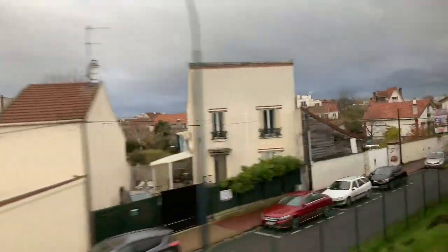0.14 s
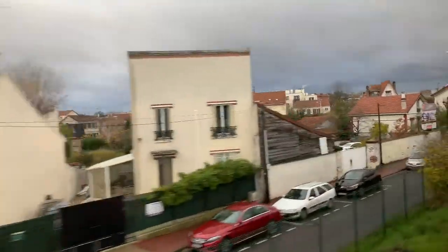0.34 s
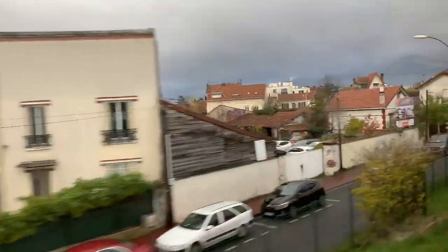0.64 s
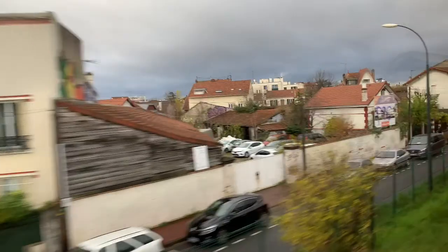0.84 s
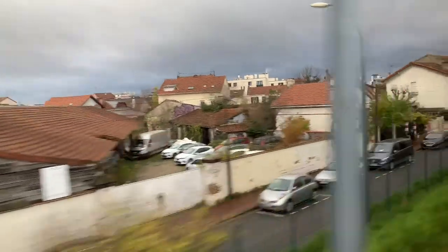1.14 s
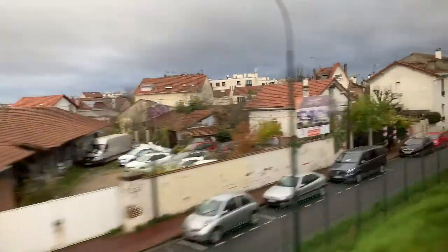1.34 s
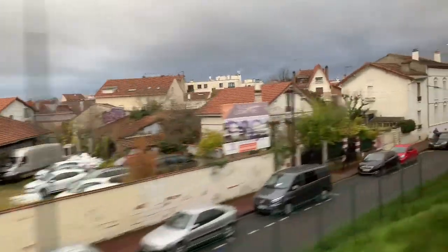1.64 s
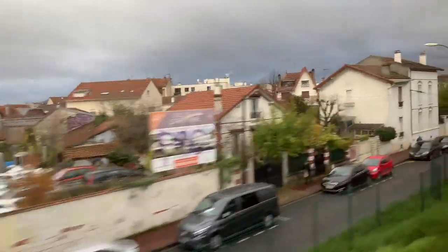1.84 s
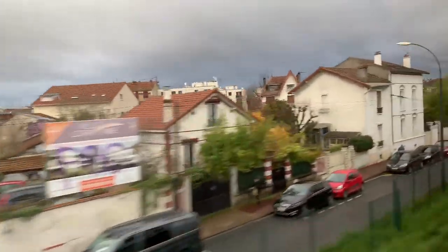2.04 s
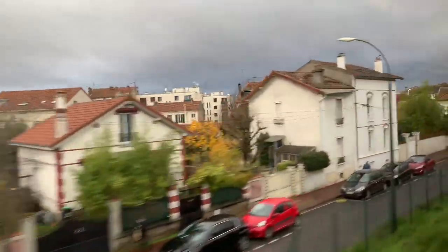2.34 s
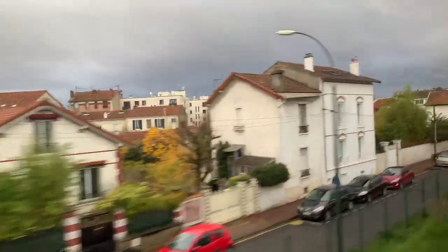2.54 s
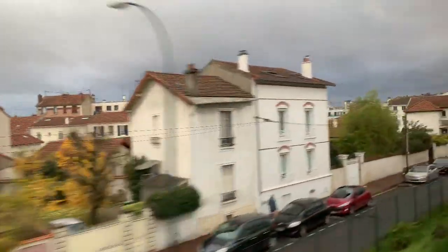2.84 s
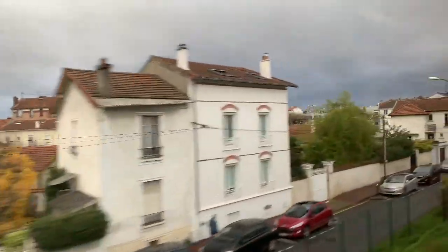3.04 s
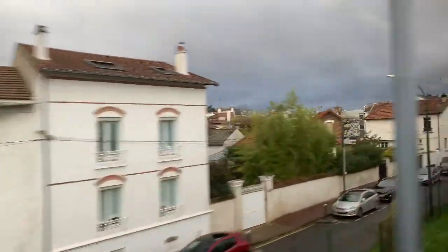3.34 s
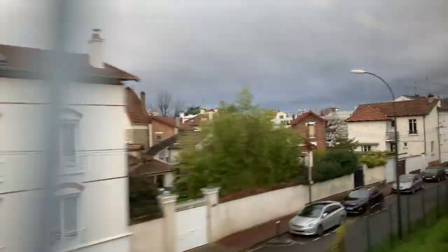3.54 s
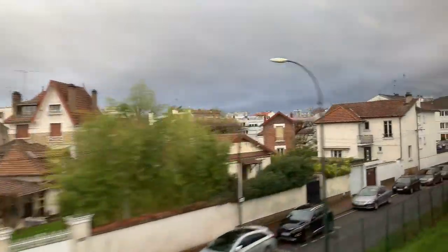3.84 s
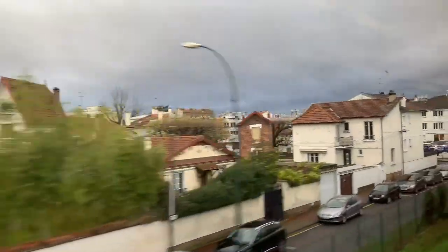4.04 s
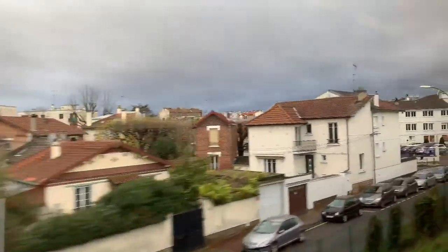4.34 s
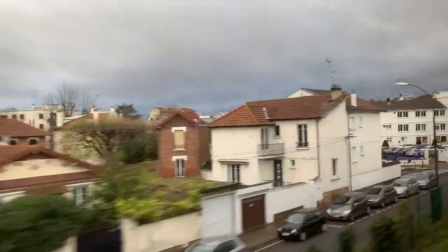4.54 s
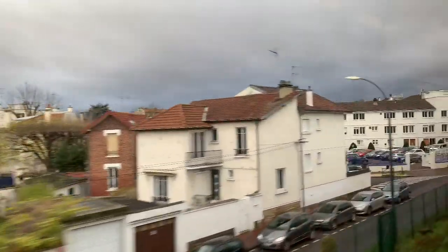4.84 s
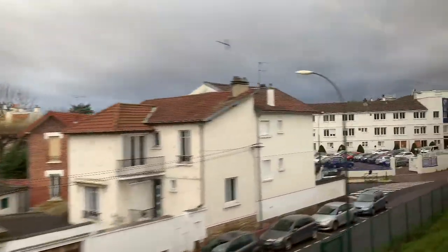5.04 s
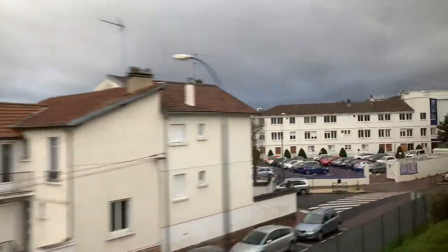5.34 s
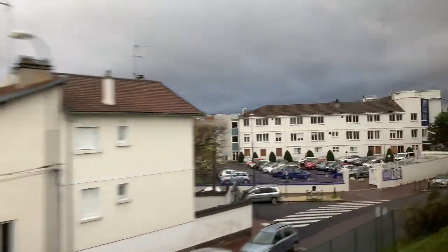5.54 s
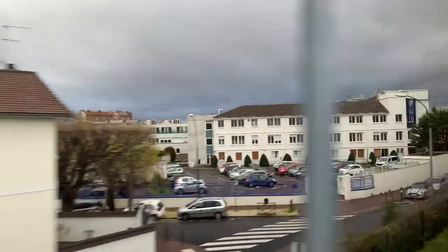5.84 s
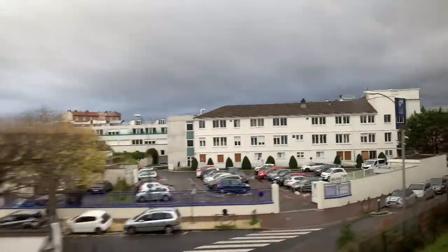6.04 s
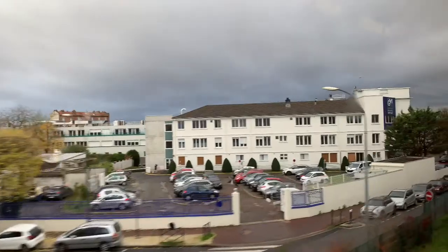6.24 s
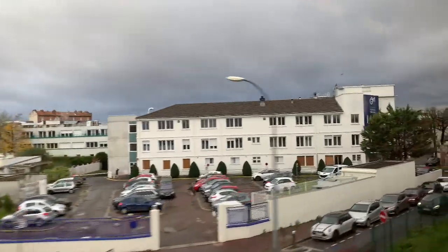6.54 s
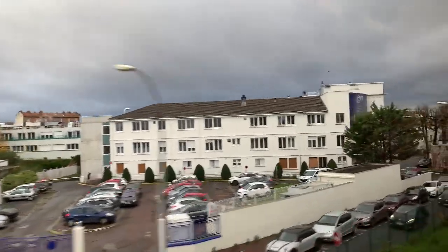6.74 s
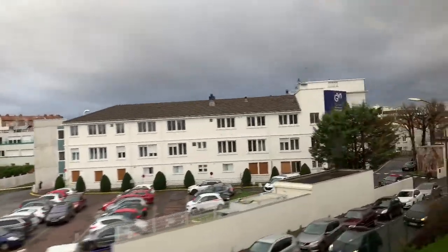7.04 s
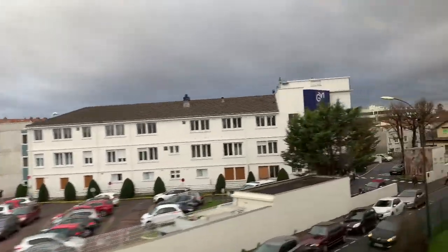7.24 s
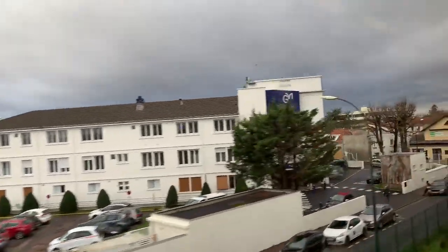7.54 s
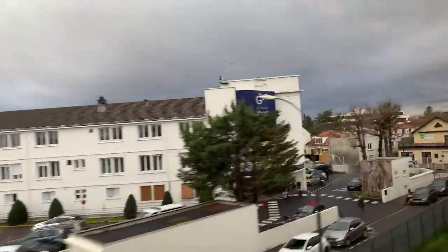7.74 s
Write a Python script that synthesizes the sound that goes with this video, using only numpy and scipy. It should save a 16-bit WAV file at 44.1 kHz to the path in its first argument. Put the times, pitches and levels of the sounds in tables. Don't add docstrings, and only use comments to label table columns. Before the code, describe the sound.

From 0 to about 8 seconds, the inside of a commuter train running at steady speed, captured in stereo by a small device beside the window. Very low rumble dominates, shuddering unevenly as the car body sways and the floor booms in soft, irregular swells rather than regular rail clacks. Above it lie a dull floor thud, wall drone and grainy muffled wheel roar, with a thin steady ventilation hiss. A faint, fuzzy gear whine surfaces intermittently at one constant pitch. Tiny trim squeaks chirp near 1.05 and 1.73 seconds, slightly left. From 2.4 seconds the booms become denser, with stronger low knocks around 3.6 to 4.3. At 4.9 a brake valve starts leaking softly; from 5.9 to about 6.45 air puffs out, fluttering, then fades into a continuing breathy leak. Rumbling continues to the end without stopping; the cabin is close, with very short echoes.

```python
import sys
import numpy as np
from scipy import signal
from scipy.fft import rfft, irfft, next_fast_len
from scipy.io import wavfile
from scipy.ndimage import uniform_filter1d, map_coordinates

SR = 44100
rng = np.random.default_rng(int(sys.argv[2]) if len(sys.argv) > 2 else 0)


def amplitude_ratio(level_db):
    exponent = np.asarray(level_db, float) / 20
    return 10 ** exponent


def put_to_file(sound):
    columns = np.atleast_2d(sound).T
    safe = np.clip(columns, -1, 1)
    whole_steps = np.round(safe * 32767)
    wavfile.write(sys.argv[1], SR, whole_steps.astype(np.int16))


N = 348831

# time in seconds, level in dB.
RAIL_ROUGHNESS = [(0, 1.5), (.4, -0.5), (.7, .5), (1.05, -0.5), (1.4, 0), (2, -1), (2.3, 0), (2.8, 0),
                  (3.4, -.5), (3.75, 0.5), (4.3, .5), (5, 0), (5.8, 1), (6.2, -0.5), (6.5, 2), (6.8, -1),
                  (7.3, .5), (7.91, -1.5)]

# middle in seconds, peak in dB, pitch in Hz, length in seconds.
BODY_SWAYS = [(0.14, -20.5, 49.0, 0.25), (0.34, -23, 56.0, 0.068), (0.82, -23, 49.0, 0.32),
              (1.44, -19, 48.0, 0.11), (1.69, -23, 56.0, 0.15), (2.04, -30, 49.0, 0.28),
              (2.4, -20, 47.0, 0.23), (2.54, -32, 43.0, 0.21), (2.83, -18, 49.0, 0.25),
              (2.84, -11.5, 56.0, 0.028), (3.27, -13, 49.0, 0.056), (3.39, -20, 52.0, 0.067),
              (3.65, -19, 49.0, 0.15), (3.76, -23.5, 44.0, 0.28), (3.96, -16.5, 47.0, 0.05),
              (4.39, -17.5, 42.0, 0.11), (4.7, -23.0, 46.0, 0.22), (4.92, -13.5, 52.0, 0.043),
              (5.26, -23.5, 49.0, 0.26), (5.61, -16.5, 47.0, 0.17), (5.68, -23, 56.0, 0.15),
              (5.79, -22, 45.0, 0.13), (5.95, -19.5, 41.0, 0.2), (6.27, -18.5, 49.0, 0.23),
              (6.53, -16.5, 40.0, 0.18), (6.94, -19, 49.0, 0.3), (7.19, -18.0, 44.0, 0.05),
              (7.31, -25, 55.0, 0.043), (7.52, -17.5, 53.0, 0.063), (7.65, -15.5, 47.0, 0.059)]
# middle in seconds, peak in dB, pitch in Hz, length in seconds.
FLOOR_BOOMS = [(0.7, -18.5, 72.0, 0.07), (1.27, -20, 63.0, 0.2), (1.42, -19, 71.44, 0.36),
               (1.75, -19.5, 67.5, 0.2), (2.22, -21, 81.0, 0.33), (2.45, -15.5, 74.0, 0.19),
               (2.48, -16, 68.3, 0.19), (2.5, -15, 61.92, 0.28), (2.92, -16, 68.0, 0.11),
               (3.33, -15, 65.44, 0.14), (3.85, -18.5, 69.97, 0.2), (3.87, -27, 63.4, 0.2),
               (4.17, -9.0, 67.34, 0.043), (4.32, -14, 62.0, 0.03), (4.44, -16, 69.0, 0.15),
               (4.53, -14.5, 57.7, 0.1), (4.65, -12.5, 66.0, 0.11), (4.87, -14, 72.0, 0.12),
               (4.95, -18.0, 63.0, 0.26), (5.04, -14, 75.3, 0.096), (5.29, -18.5, 73.9, 0.16),
               (5.44, -13.5, 61.0, 0.052), (5.81, -18, 69.5, 0.12), (6.01, -16, 66.2, 0.14),
               (6.27, -11.5, 65.7, 0.035), (6.55, -13, 69.2, 0.16), (6.74, -17, 67.0, 0.13),
               (6.97, -14, 70, 0.057), (7.29, -18, 67.2, 0.21), (7.45, -11.5, 58.0, 0.04)]
# middle in seconds, peak in dB, pitch in Hz, length in seconds.
PANEL_KNOCKS = [(0.14, -39.5, 277.0, 0.38), (0.21, -25.5, 82.2, 0.18), (0.29, -36.5, 299.6, 0.092),
                (1.12, -36.5, 301.5, 0.06), (2.14, -30, 193.4, 0.06), (2.61, -38, 235, 0.23),
                (2.83, -21.5, 79.2, 0.074), (2.86, -40.5, 301.4, 0.25), (3.26, -27, 124.0, 0.048),
                (3.42, -25.5, 78.3, 0.2), (3.46, -42.5, 301.0, 0.22), (3.63, -17.5, 82.0, 0.036),
                (3.72, -39.5, 301.7, 0.23), (3.78, -16, 79.0, 0.074), (4.0, -20.5, 82.1, 0.14),
                (4.28, -23, 79.4, 0.065), (4.52, -31.5, 140.7, 0.13), (4.59, -28, 80.7, 0.16),
                (4.82, -24, 120, 0.046), (5.28, -37.5, 278, 0.14), (5.48, -27.5, 129.6, 0.055),
                (5.85, -29.0, 129.7, 0.18), (5.87, -18.5, 79.8, 0.14), (6.44, -22.5, 127.0, 0.038),
                (6.52, -27.5, 155.5, 0.06), (6.54, -26, 205.8, 0.039), (7.09, -26.5, 76.0, 0.3),
                (7.35, -25.5, 82.2, 0.26), (7.45, -25, 121.7, 0.065), (7.78, -26, 129, 0.065)]
# frequency in Hz, level in dB per Hz.
SHAKING_COLOUR = [(15, -37), (30, -2.5), (42, -0.5), (66, 3), (82, 0), (100, -17), (130, -30.5), (200, -73)]

# frequency in Hz, level in dB per Hz.
THUD_COLOUR = [(70, -44), (95, -4.5), (112, -9.5), (127, -5), (160, -11), (200, -10), (260, -15.5),
               (340, -53.5), (570, -120)]
# frequency in Hz, level in dB per Hz.
ROAR_COLOUR = [(140, -30), (240, -9.5), (290, -6), (326, -5), (422, -9), (453, -10.5), (601, -14),
               (701, -9.5), (974, -13.5), (1490, -16), (1620, -19.5), (1910, -19), (4000, -30),
               (5200, -41.5), (8800, -120)]
# pitch in Hz, width in Hz, level in dB.
RINGING_PANELS = [(272.2, 9.9, -49), (298.8, 16.8, -49), (418.5, 5.7, -56), (684.3, 35, -55),
                  (713, 38, -56), (850, 30, -55.5), (1101, 30, -56.5), (1507, 35, -60), (1660, 15, -64.5),
                  (1710, 22, -63.5), (1950, 32, -59), (2305, 19, -70.5)]

# frequency in Hz, level in dB per Hz.
VENT_COLOUR = [(2000, -19), (3500, -10.5), (4400, -3.5), (5000, -3.5), (6000, -5.5), (7500, -11),
               (8400, -10.5), (10400, -15.5), (12100, -21), (13200, -18), (14100, -33), (14900, -39)]
# middle in seconds, peak in dB.
GEAR_LOADS = [(.48, -54), (.92, -49), (1.36, -55), (1.53, -56.5), (2.42, -54), (2.57, -49), (2.89, -50),
              (3.0, -51), (3.16, -51), (3.33, -59), (3.43, -61), (3.62, -51), (3.85, -46), (4.1, -56),
              (4.29, -45.5), (4.66, -57), (5.0, -50), (5.13, -49), (5.22, -52), (5.55, -41.5), (5.95, -45),
              (6.13, -45), (6.28, -55), (6.46, -57), (6.67, -56), (6.76, -47), (7.08, -55), (7.33, -52),
              (7.68, -47)]
# start in seconds, peak in dB, top pitch in Hz.
TRIM_SQUEAKS = [
    (1.047, -43, 3050),
    (1.732, -42, 3140),
]

# start in seconds, hold in seconds, level in dB.
VALVE_PUFFS = [
    (5.9, .04, -54.5),
    (5.963, 0.23, -46.5),
    (6.196, 0.046, -49.5),
    (6.26, 0.17, -46.5),
]
# frequency in Hz, level in dB per Hz.
JET_COLOUR = [(1200, -31), (2500, -1.5), (3500, -1.5), (5400, 2.5), (6300, 0), (7300, -2.5), (8100, -3),
              (8800, 0), (10000, -5), (12000, -6), (14500, -14), (15500, -33)]
# pitch in Hz, width in Hz, lift in dB.
DUCT_LIFTS = [(4550, 250, 1.5), (5130, 300, -2.5), (6232, 30, 3), (6868, 50, 3.5), (8047, 120, 4.5),
              (8240, 60, 3), (9079, 40, 3), (9553, 40, 3), (10203, 40, 4)]

# frequency in Hz, likeness from 0 to 1.
MIC_LIKENESS = [(20, .998), (90, .998), (200, .96), (280, .5), (420, .72), (900, .55), (1200, .62),
                (2000, .15), (5000, .3), (8000, .35), (9300, .45), (10300, .7), (11500, .98), (15000, .98)]
# frequency in Hz, lead in radians.
RIGHT_LEAD = [(20, .4), (100, .37), (200, .32), (300, .9), (450, .7), (700, 1.1), (1200, 2.3), (1600, 2.2),
              (2100, 1.5), (4000, -1.5), (5000, -3), (7000, -7), (10300, 0), (11800, 3.14), (13350, 6.28),
              (14900, 9.42)]
# frequency in Hz, difference in dB.
LEFT_TILT = [(30, -3), (110, -2.4), (200, -.5), (300, 3), (450, -.5), (690, -1.3), (1260, 3.5), (2000, 0),
             (5000, -.5), (8000, -4), (9500, -3.5), (11300, 0)]


def unit(x):
    return x / np.sqrt(np.mean(x ** 2) + 1e-20)


def along(points, hz):
    point_hz, value = np.transpose(points)
    return np.interp(np.log(hz + 1), np.log(point_hz + 1), value)


def coloured(spectrum):
    return lambda hz: amplitude_ratio(along(spectrum, hz))


def resonance(centre_hz, width_hz):
    return lambda hz: (hz * width_hz / (centre_hz ** 2 - hz * hz + 1j * hz * width_hz)) ** 2


def filtered(x, response):
    m = next_fast_len(N + 8192)
    hz = np.fft.rfftfreq(m, 1 / SR)
    return irfft(rfft(x, m) * response(hz), m)[..., :N]


def wobble(rate):
    knots = rng.standard_normal(int(N * rate / SR) + 4)
    return map_coordinates(knots, [np.arange(N) * rate / SR])


def plain(gain):
    return unit(filtered(rng.standard_normal((2, N)), gain))


def rush(gain, patchy_db, slow=14):
    z = signal.stft(rng.standard_normal((2, N)), nperseg=512)[2]
    field = uniform_filter1d(rng.standard_normal(z.shape[1:]), size=5, axis=0)
    field = uniform_filter1d(field, size=slow, axis=1)
    pair = signal.istft(z * amplitude_ratio(patchy_db * unit(field)), nperseg=512)[1][:, :N]
    return unit(filtered(pair, gain))


def swell(middle_s, length_s):
    first = max(0, int((middle_s - 2 * length_s) * SR))
    last = min(N, int((middle_s + 2 * length_s) * SR))
    t = np.arange(first, last) / SR
    return slice(first, last), 2. ** -(2 * (t - middle_s) / length_s) ** 2


def rail_roughness_db():
    s, db = np.transpose(RAIL_ROUGHNESS)
    return np.interp(np.arange(N) / SR, s, db)


def mode(rows, wander_hz):
    t = np.arange(N) / SR
    tremble = np.cumsum(wander_hz * wobble(14)) / SR
    tremble = tremble + np.array([[0], [.25]])
    out = np.zeros((2, N))
    for (s, db, hz, length_s), start in zip(rows, rng.random((len(rows), 1))):
        near, bell = swell(s, length_s)
        cycles = hz * t[near] + tremble[:, near] + start
        out[:, near] += amplitude_ratio(db) * bell * np.sin(2 * np.pi * cycles)
    return out


def body():
    loose = amplitude_ratio(-26 + 0.48 * rail_roughness_db()) * plain(coloured(SHAKING_COLOUR))
    sway = mode(BODY_SWAYS, wander_hz=1.6)
    boom = mode(FLOOR_BOOMS, wander_hz=2.2)
    knocks = mode(PANEL_KNOCKS, wander_hz=3)
    return sway + boom + knocks + loose


def rolling():
    rail_db = rail_roughness_db()
    colour = coloured(THUD_COLOUR)
    low = lambda hz: 1 / (1 + (hz / 170) ** 6)
    thud = amplitude_ratio(-34 + rail_db + .7 * wobble(7)) * plain(lambda hz: colour(hz) * np.sqrt(low(hz)))
    drone = amplitude_ratio(-37.5 + rail_db + .7 * wobble(7)) * plain(lambda hz: colour(hz) * np.sqrt(1 - low(hz)))
    roar = amplitude_ratio(-37.5 + .15 * rail_db + 0.49 * wobble(5.0)) * rush(coloured(ROAR_COLOUR), patchy_db=1.11)

    def ringing(f):
        return sum(amplitude_ratio(db) / np.sqrt(width) * resonance(hz, width)(f) for hz, width, db in RINGING_PANELS)

    panels = amplitude_ratio(-43) * rush(ringing, patchy_db=1.0, slow=40)
    return thud + drone + roar + panels


def ventilation():
    return amplitude_ratio(-55.5 + .4 * wobble(2.73)) * rush(coloured(VENT_COLOUR), patchy_db=1.34)


def gears():
    mesh_hz = 1536
    load = np.zeros(N)
    for s, db in GEAR_LOADS:
        near, bell = swell(s, 0.089)
        load[near] += amplitude_ratio(db) * bell
    pitch_hz = mesh_hz + 4 * np.array([wobble(16), wobble(12)])
    tone = np.sin(2 * np.pi * np.cumsum(pitch_hz, axis=1) / SR)
    idle = amplitude_ratio(-60) * plain(resonance(mesh_hz, 17))
    return load * tone + idle


def trim():
    out = np.zeros(N + SR)
    u = np.linspace(-1, 1, num=int(0.013 * SR))
    for s, db, hz in TRIM_SQUEAKS:
        pitch_hz = hz * (1 - 0.255 * (u + 0.14) ** 2)
        squeak = (1 - u * u) * np.sin(2 * np.pi * np.cumsum(pitch_hz) / SR)
        out[round(s * SR):][:len(u)] += amplitude_ratio(db) * squeak
    return out[:N] * np.array([[1], [.4]])


def brake_air():
    t = np.arange(N) / SR
    leak_s, rise_s, fall_s = 4.88, 0.038, 0.066
    leak = np.clip((t - leak_s) / 0.93, 0, 1)
    blow = np.zeros(N)
    for s, hold_s, db in VALVE_PUFFS:
        opening = np.clip((t - s) / rise_s, 0, 1)
        closing = np.exp(-np.clip(t - s - hold_s, 0, None) / fall_s)
        blow += amplitude_ratio(db) * opening * closing
    flow = np.hypot(amplitude_ratio(-54.5) * leak, blow)
    jet = flow * amplitude_ratio(0.73 * wobble(25)) * rush(coloured(JET_COLOUR), patchy_db=1.5)
    leak_ring = leak * amplitude_ratio(-64.5 + 2 * (t - leak_s))
    breathy = np.hypot(leak_ring, amplitude_ratio(-60) * blow / blow.max())
    return jet + breathy * amplitude_ratio(1.6 * wobble(5.7)) * plain(resonance(4280, 500))


def ducts(hz):
    return amplitude_ratio(sum(lift_db / (1 + (2 * (hz - centre) / width) ** 2) for centre, width, lift_db in DUCT_LIFTS))


def cabin(x, wet_db, t60):
    t = np.arange(SR // 8) / SR
    tail = rng.standard_normal(len(t)) * amplitude_ratio(-60 * t / t60)
    tail = tail / np.linalg.norm(tail)
    echoes = signal.fftconvolve(x, tail[None], axes=1)[:, :N]
    wet = filtered(echoes, lambda hz: hz ** 2 / (hz ** 2 + 500 ** 2))
    return x + amplitude_ratio(wet_db) * wet


def scene():
    shaking = body()
    wheels = rolling()
    hiss = filtered(ventilation() + brake_air(), ducts)
    return shaking + cabin(wheels + hiss + gears() + trim(), wet_db=-15, t60=.15)


def band_limit(x):
    return signal.sosfilt(signal.butter(12, 15040, fs=SR, output="sos"), x)


def record(dry):
    turn = lambda hz: np.arccos(np.clip(along(MIC_LIKENESS, hz), 0, 1)) / 2
    shared, apart = filtered(dry, lambda hz: np.array([np.cos(turn(hz)), np.sin(turn(hz))]))
    sign = np.array([[1], [-1]])

    def ports(hz):
        low_cut = 1 / (1 + (29 / (hz + 1)) ** 6)
        lead = np.interp(hz, *np.transpose(RIGHT_LEAD))
        return low_cut * amplitude_ratio(sign * along(LEFT_TILT, hz) / 2) * np.exp(-.5j * sign * lead)

    heard = filtered(shared + sign * apart, ports)
    heard = heard / (1 + np.abs(heard / .52) ** 6) ** (1 / 6)
    return band_limit(heard)


dry = scene()
out = record(dry)
put_to_file(out)
```